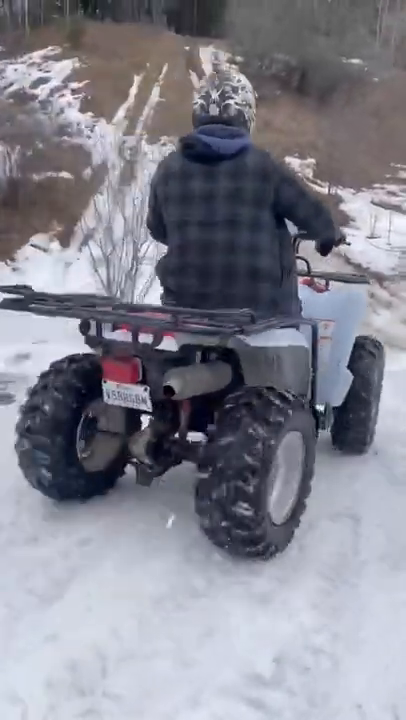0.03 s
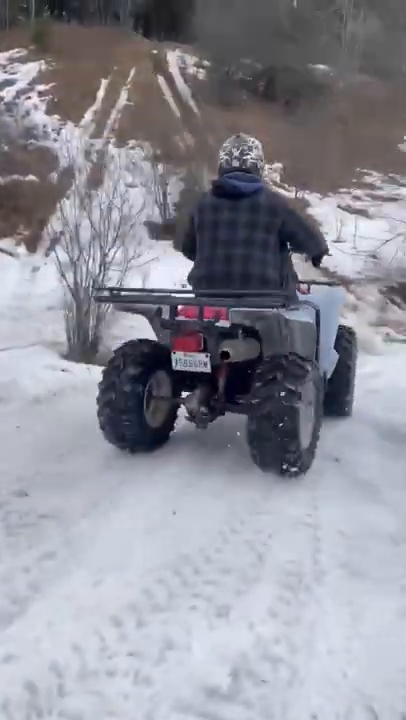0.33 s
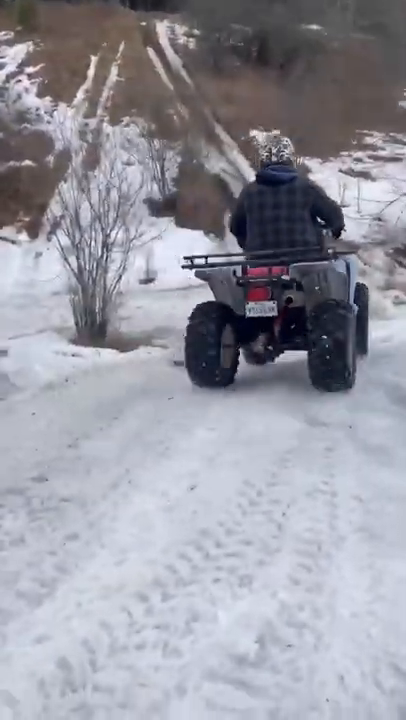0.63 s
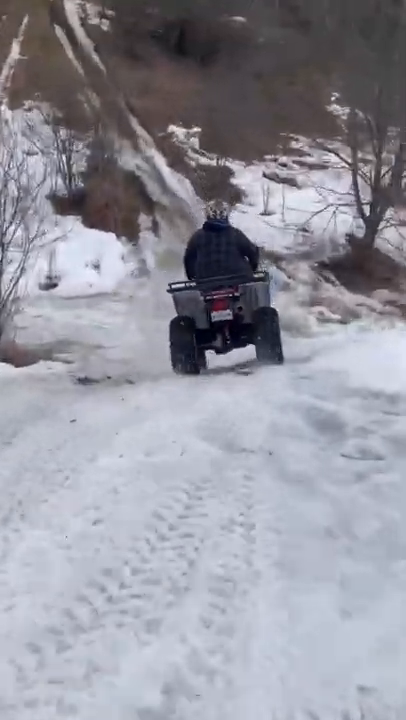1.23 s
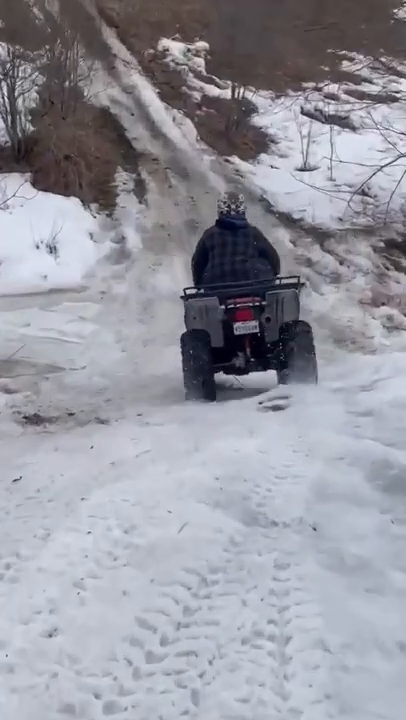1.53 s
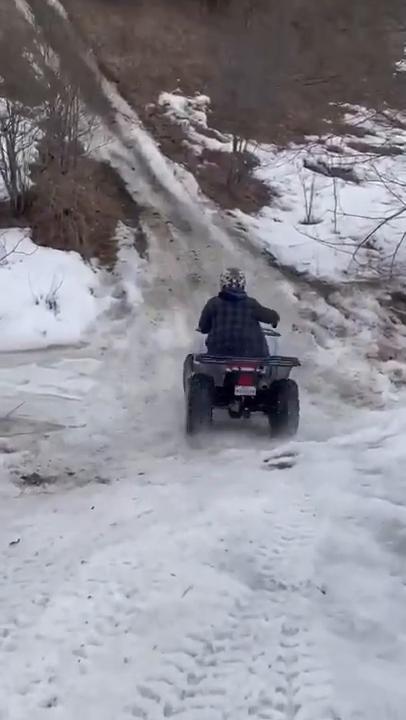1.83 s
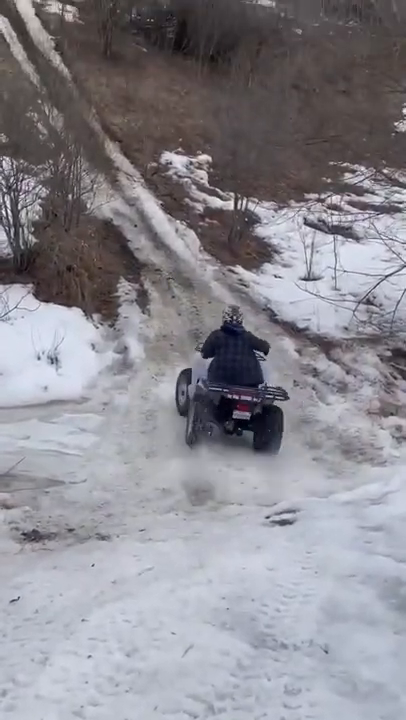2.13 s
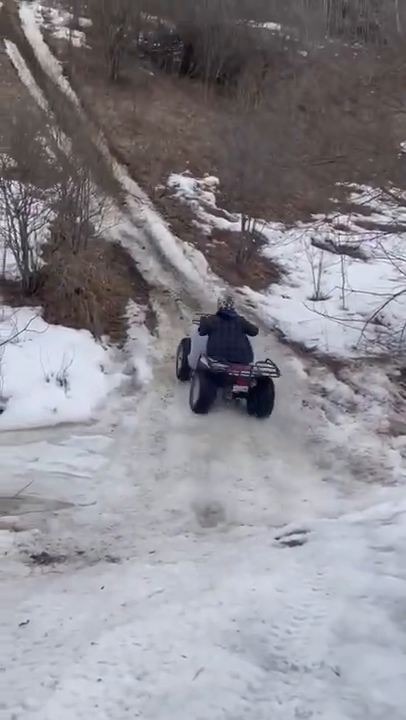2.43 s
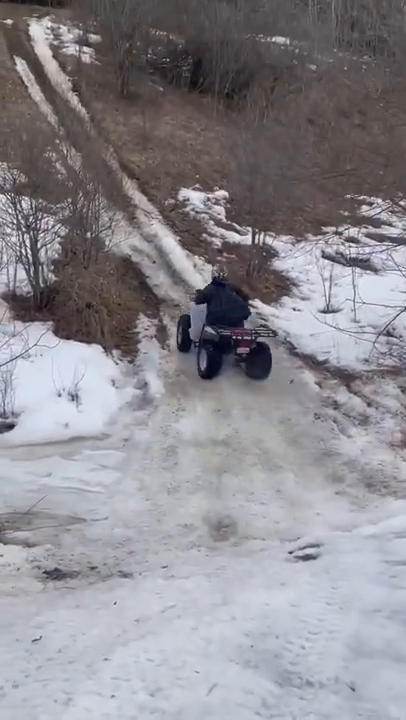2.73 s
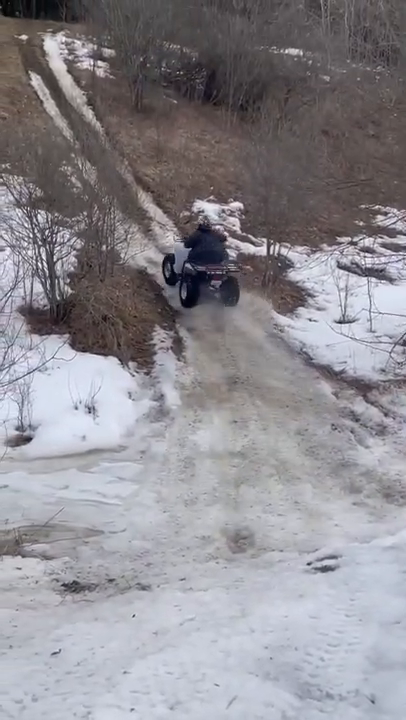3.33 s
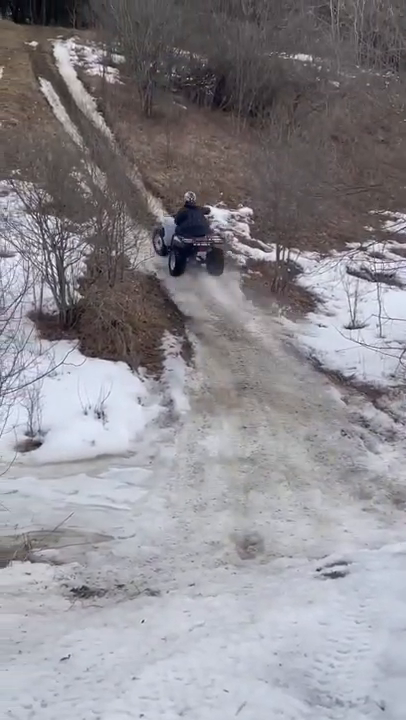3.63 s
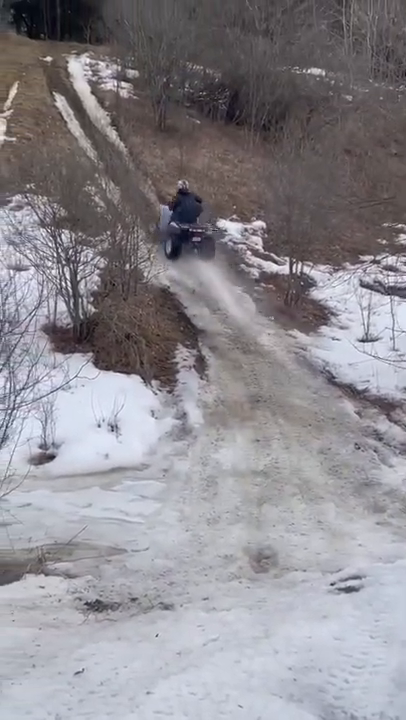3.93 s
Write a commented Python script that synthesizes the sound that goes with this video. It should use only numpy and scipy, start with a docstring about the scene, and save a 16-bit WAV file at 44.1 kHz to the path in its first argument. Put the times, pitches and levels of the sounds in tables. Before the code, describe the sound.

A single-cylinder quad bike pulls away close by over crunching snow, with a few metallic clacks. It coasts briefly with uneven pops, then accelerates uphill with a growing rasp, while light wind rumbles on the microphone.

```python
"""A single-cylinder quad bike pulls away over crunching snow, with a metallic ring and a few clacks,
while a light wind rumbles on the microphone. Each firing booms in the silencer and cracks out of the pipe.
Just before one second the quad coasts for a moment and the engine pops unevenly.
Then it speeds up and climbs a hill: the rasp grows under load, the hillside throws back an echo,
and the pulsing hiss smears out with distance."""
import sys
import numpy as np
from scipy import signal
from scipy.io import wavfile
from scipy.ndimage import uniform_filter1d

SR = 44100
rng = np.random.default_rng(int(sys.argv[2]) if len(sys.argv) > 2 else 0)


def store_pcm(level_fs):
    """Save levels as 16-bit WAV."""
    pcm = np.round(np.clip(level_fs, -1, 1) * 32767).astype(np.int16)
    wavfile.write(sys.argv[1], SR, np.atleast_2d(pcm).T)


N = 176400
T = np.arange(N) / SR


def amp(db):
    """Turns decibels into a number to multiply by."""
    return 10 ** (np.asarray(db) / 20)


def curve(table, column=1):
    """Joins one column of a time table by straight lines."""
    table = np.array(table)
    return np.interp(T, table[:, 0], table[:, column])


def swell(middle_s, half_length_s):
    """A bell-shaped gain that rises to 1 and falls again."""
    return np.exp(-np.square((T - middle_s) / half_length_s))


def unit(x):
    """Scales a signal to an average level of 1."""
    return x / np.sqrt(np.mean(x ** 2) + 1e-20)


def smooth(x, size):
    """Averages twice over `size` neighbouring values."""
    return uniform_filter1d(uniform_filter1d(x, size), size)


def steady(x):
    """Holds the slow level at 1 and leaves the single beats alone."""
    return x / np.sqrt(abs(smooth(x ** 2, size=4400)) + 1e-14)


def add(mix, start_s, sound):
    """Mixes a short sound in at the given time."""
    part = mix[max(round(start_s * SR), 0):][:len(sound)]
    part += sound[:len(part)]


def colour(x, tone):
    """Filters by a table of pitch_hz, gain_db; the filter rings after a click, never before it."""
    pitch_hz, gain_db = np.transpose(tone)
    bin_hz = abs(np.fft.fftfreq(16384, 1 / SR))
    log_gain = np.log(amp(np.interp(np.log(bin_hz + 1), np.log(pitch_hz), gain_db)))
    spectrum = np.exp(np.conj(signal.hilbert(log_gain)))
    click_response = np.fft.ifft(spectrum).real[:4096]
    return signal.oaconvolve(x, click_response)[:len(x)]


def resonate(x, pitch_hz, width_hz, widen=2):
    """Rings at one pitch through two resonances in a row, the second `widen` times as wide."""
    for band_hz in (width_hz, widen * width_hz):
        r = np.exp(-np.pi * band_hz / SR)
        x = signal.lfilter([1 - r, 0, r - 1], [1, -2 * r * np.cos(2 * np.pi * pitch_hz / SR), r * r], x)
    return x


def flicker(depth_db=1.3):
    """A gain that wavers by chance a few times a second."""
    return amp(depth_db * unit(smooth(rng.standard_normal(N), size=3500)))


def grains(ticks_per_s=2500, spread_db=3):
    """Dense little ticks of uneven size."""
    sizes = amp(spread_db * np.minimum(rng.exponential(1, N), 6)) * rng.standard_normal(N)
    return unit(sizes * (rng.random(N) < ticks_per_s / SR))


def wind(level_db=-27, gust_db=1.5):
    """Light gusts make a low, lumpy rumble."""
    # tone of the wind: pitch_hz, gain_db
    wind_tone = [(15, -23), (32, -16), (55, 2.5), (100, 4), (160, -11), (250, -8), (500, -15.5),
                 (1500, -21), (6000, -58)]
    gusts = unit(smooth(rng.standard_normal(N), size=5000))
    return unit(colour(rng.standard_normal(N), wind_tone)) * amp(level_db + gust_db * gusts)


def tyres():
    """Snow and slush crunch under the treads and fly off as a fine spray."""
    # tones of the crunch and the spray: pitch_hz, gain_db
    crunch_tone = [(200, -16), (600, 7.5), (1800, 11.5), (3500, 4), (6000, -6.5), (7800, -37),
                   (12000, -7.5)]
    spray_tone = [(5000, -17), (8000, -20), (9500, 7.5), (11000, 6.5), (12000, -16)]
    # how loud each is: time_s, level_db
    crunch_levels = [(0, -38.5), (.48, -39.5), (.62, -40.5), (1, -46), (1.7, -37.5), (2, -35), (3, -32),
                     (4, -39)]
    spray_levels = [(0, -49), (.45, -50), (.7, -61), (1, -61.5), (1.15, -55.5), (1.6, -60.5), (1.95, -48),
                    (2.4, -47), (2.9, -52), (3.2, -52.5), (4, -55.5)]
    crunch = unit(colour(grains(), crunch_tone)) * amp(curve(crunch_levels))
    spray = unit(colour(grains(), spray_tone)) * amp(curve(spray_levels)) * flicker()
    return crunch + spray


def chassis(decay_s=.012):
    """The rack and drive clack over bumps."""
    # one clack a row: start_s, level_db
    clacks = [(.004, -35), (0.146, -39), (0.409, -38), (2.449, -35), (2.74, -42), (2.853, -40),
              (3.367, -38)]
    # tone of a clack: pitch_hz, gain_db
    clack_tone = [(600, -21), (1500, -41), (2800, 2), (4000, -1), (5200, 18), (7500, 16.5), (12000, -23)]
    out, t = np.zeros(N), T[:2000]
    for start_s, level_db in clacks:
        noise = unit(colour(rng.standard_normal(len(t)), clack_tone))
        add(out, start_s, amp(level_db) * noise * np.exp(-t / decay_s))
    return out


def metallic_ring(level_db=-37.5):
    """A ring at one pitch, probably from the drive, heard while the quad is close."""
    ring = resonate(rng.standard_normal(N), pitch_hz=1710, width_hz=45)
    return steady(ring) * amp(level_db) * swell(middle_s=.34, half_length_s=.51)


def hillside_echo(x, strength=.45, arrive_s=2.4, fade_s=.4):
    """The hill throws the sound back ever later as the quad climbs, sweeping the tone downwards."""
    # how late the echo is: time_s, delay_s
    delays = [(2.1, .0006), (2.6, .00127), (3.05, .00163), (3.3, .00196), (4, .0026)]
    gain = strength * np.clip((T - arrive_s) / fade_s + .5, 0, 1)
    echo = np.interp(T - curve(delays), T, x)
    return (x + gain * echo) / np.sqrt(1 + gain ** 2)


def coasting_pops(boom_hz=106.8, rise_s=.0048, decay_s=.01872, puff_s=.0024):
    """With the throttle shut, uneven firings give a deeper boom and a short hollow bark."""
    # one pop a row: start_s, boom_db, bark_db
    pops = [(.753, -10, -46), (0.782, -25, -23.5), (0.811, -18, -28), (0.841, -13, -32), (0.896, -8, -23),
            (0.958, -12, -23.5), (1.059, -35, -22.5)]
    out, t = np.zeros(N), T[:6000]
    boom = (1 - np.exp(-t / rise_s)) * np.exp(-t / decay_s) * np.sin(2 * np.pi * boom_hz * t)
    for start_s, boom_db, bark_db in pops:
        puff = rng.standard_normal(len(t)) * t * np.exp(-t / puff_s)
        bark = resonate(puff, pitch_hz=1004, width_hz=160)
        add(out, start_s, amp(bark_db) * bark / abs(bark).max() - amp(boom_db) * boom / abs(boom).max())
    return out


def firing_times(wobble_s=.00016, jitter_s=.00004):
    """The engine fires in step with its speed, wobbling a little over a few turns."""
    # engine speed: time_s, firings_per_s
    speed = [(0.0, 25.71), (0.335, 32.56), (0.503, 33.8), (0.73, 35.9), (0.93, 33.1), (1.006, 28.66),
             (1.239, 33.8), (1.57, 40.16), (1.803, 48.27), (2.044, 49.36), (2.122, 52.95), (2.374, 55.73),
             (2.578, 57.82), (2.631, 59.88), (2.915, 61.68), (3.219, 62.7), (3.463, 62.76), (3.611, 63.89),
             (3.794, 61.71), (3.895, 64.44), (4.0, 63.38)]
    fired_so_far = np.cumsum(curve(speed)) / SR
    times = np.interp(np.arange(int(fired_so_far[-1]) + 1), fired_so_far, T)
    slow, fast = rng.standard_normal((2, 400))
    return times + (wobble_s * unit(smooth(slow, size=4)) + jitter_s * fast)[:len(times)]


def firing_clicks(times, delay_s, scatter_db=.8):
    """One click for each firing, a little uneven in strength."""
    at = np.clip(np.round((times + delay_s) * SR).astype(int), 0, N - 1)
    clicks = np.zeros(N)
    clicks[at] = amp(scatter_db * rng.standard_normal(size=400)[:len(at)])
    return clicks


def gas_bursts(clicks, fresh_share, tail_db, smear_db=0, stages=15):
    """Each firing lets out a burst of gas; its shape repeats, slowly smearing as the quad moves off."""
    rise_s, near_decay_s, far_decay_s, tail_s = .0012, .0016, .0018, .032
    t, repeated, power = T[:2600], np.zeros(N), np.zeros(N)
    for distance in np.linspace(0, 1, stages):  # each stage fades into the next
        decay_s = near_decay_s + (far_decay_s - near_decay_s) * distance
        echo_tail = amp(tail_db + smear_db * distance) * np.exp(-t / tail_s)
        burst = (1 - np.exp(-t / rise_s)) * (np.exp(-t / decay_s) + echo_tail)
        stage_clicks = clicks * np.cos(np.pi / 2 * np.clip((T / T[-1] - distance) * (stages - 1), -1, 1))
        repeated += signal.oaconvolve(stage_clicks, burst * rng.standard_normal(len(t)))[:N]
        power += signal.oaconvolve(stage_clicks ** 2, burst ** 2)[:N]
    fresh = np.sqrt(fresh_share * abs(power)) * rng.standard_normal(N)  # new noise in every burst
    return np.sqrt(1 - fresh_share) * repeated + fresh


def pipe_rings(clicks, gas, stirred_hz=980):
    """The pipe's low resonances ring cleanly; its high ones are stirred by the gas."""
    # notes that stand out for a while: middle_s, half_length_s, pitch_hz, width_hz, level_db
    rings = [(0.044, 0.15, 429, 41, -28), (0.253, 0.26, 460, 110, -34.5), (0.6, 0.068, 970, 79, -32.5),
             (1.204, 0.092, 1600, 110, -35.5), (1.22, 0.14, 1050, 110, -44), (1.513, .2, 640, 24, -35.5),
             (1.644, 0.13, 832, 130, -33), (1.953, 0.32, 277, 52, -31.5), (2.38, 0.32, 1434, 170, -32.5),
             (2.644, 0.11, 1720, 430, -24.5), (2.02, 0.05, 1610, 490, -27), (3.064, 0.16, 2344, 260, -31),
             (3.114, 0.27, 1023, 45, -30), (3.42, 1, 870, 10.4, -37), (3.67, 0.45, 1005, 53, -36),
             (0.64, 0.25, 184, 23, -26)]
    out = np.zeros(N)
    for middle_s, half_length_s, pitch_hz, width_hz, level_db in rings:
        stir = .77 * min(pitch_hz / stirred_hz, 1) ** 2
        ring = resonate(unit(clicks) + stir * unit(gas), pitch_hz, width_hz, widen=3)
        out += steady(ring) * amp(level_db) * swell(middle_s, half_length_s)
    return out


def tailpipe(times, scatter_db=1.67, bark_trim_db=-3):
    """Gas cracks out of the pipe as a middle bark, a higher rasp and a hiss on top."""
    # the crack comes earlier once the throttle opens: time_s, delay_s
    crack_delays = [(.6, .0015), (1.1, -.0006)]
    # how loud each part is, before the bark's trim: time_s, bark_db, rasp_db, hiss_db
    levels = [(0.0, -25.5, -50, -32), (0.03, -30.5, -42, -40.5), (0.4, -26.5, -39, -38),
              (0.58, -29, -54, -45), (0.85, -37.5, -47, -50.5), (1.0, -44, -56, -54), (1.1, -29, -42, -44),
              (1.5, -32.5, -44, -45.5), (1.83, -31.5, -33.5, -42), (1.93, -30.5, -27, -32.5),
              (2.38, -29.5, -31.5, -37), (2.57, -26.5, -28, -34), (2.81, -25.5, -31, -40),
              (2.88, -28, -27.5, -31.5), (3.04, -28, -30, -37), (3.69, -29, -30, -36.5),
              (4.0, -27.5, -34.5, -39.5)]
    # tone of each part: pitch_hz, gain_db
    bark_tone = [(200, -48.5), (450, -7), (750, -2), (1000, 3.5), (1400, 3.5), (1900, -3.5), (2400, -12.5),
                 (4000, -33.5)]
    rasp_tone = [(1000, -37.5), (1800, 2), (2200, 0.5), (2600, 1), (3050, 2), (3600, -6), (4500, -15),
                 (8000, -60)]
    hiss_tone = [(2000, -17), (3800, 0), (5000, 4.5), (6200, 3), (7600, -19.5), (8600, -27), (12000, -17)]
    times = times + np.interp(times, *np.transpose(crack_delays))
    direct = firing_clicks(times, delay_s=0, scatter_db=scatter_db)
    # each crack returns once down the pipe, strongest while the quad is close
    returned = firing_clicks(times, delay_s=.0058, scatter_db=scatter_db)
    return_db = -15 + 6.5 * swell(middle_s=0, half_length_s=1.7)
    clicks = direct + amp(return_db) * returned
    gas = gas_bursts(clicks, fresh_share=.15, tail_db=-19.5)
    bark = steady(colour(hillside_echo(gas), bark_tone)) * amp(curve(levels, column=1) + bark_trim_db)
    rasp = hillside_echo(gas_bursts(clicks, fresh_share=.25, tail_db=-17.5))
    rasp = steady(colour(rasp, rasp_tone)) * amp(curve(levels, column=2)) * flicker()
    hiss = steady(hillside_echo(gas_bursts(clicks, fresh_share=.7, tail_db=-11, smear_db=30)))
    chain_whirr = .67 * grains()  # chain and gears run evenly against the pulsing hiss
    hiss = steady(colour(hiss + chain_whirr, hiss_tone)) * amp(curve(levels, column=3)) * flicker()
    return bark + rasp + hiss + pipe_rings(direct, gas)


def silencer(times, coast_db=-4.5, drone_trim_db=-2):
    """Firings ring the silencer: a deep thud, a boom that weakens while coasting, and a drone."""
    # tone of each part, with the drone close by and up the hill: pitch_hz, gain_db
    thud_tone = [(20, -52), (45, -11), (60, -1), (75, 11), (110, -15), (300, -102)]
    boom_tone = [(40, -31.5), (80, -37), (110, -5), (132, 2), (160, -6), (195, -12.5), (260, -49),
                 (600, -80)]
    near_tone = [(110, -56), (165, -3), (210, -4), (275, 3), (330, -8.5), (400, -13), (520, -17.5),
                 (1200, -59.5)]
    far_tone = [(120, -57.5), (200, -11.5), (252, 5), (310, -8), (374, 1), (440, -18), (600, -20),
                (1200, -72)]
    # how loud the thud is: time_s, level_db
    thud_levels = [(0, -28), (.45, -23.5), (.75, -29), (1.05, -31), (1.5, -30), (2, -23), (2.4, -31.5),
                   (3.2, -36), (4, -30)]
    # how loud the others are, before the coasting dip and the trim: time_s, boom_db, drone_db
    levels = [(0.0, -18, -24), (0.03, -15.5, -26), (0.31, -15, -31.5), (0.72, -21.5, -29.5),
              (0.77, -12.5, -39), (0.83, -16.5, -25), (0.88, -17, -49), (0.9, -15, -24.5),
              (0.93, -18.5, -54), (1.06, -16.5, -27.5), (1.17, -19.5, -25), (1.57, -23.5, -21.5),
              (1.68, -22, -23.5), (2.75, -18, -22), (3.05, -16.5, -21), (3.75, -18.5, -25),
              (4.0, -18.5, -29.5)]
    coast_s, coast_half_s, far_s, far_fade_s = .874, .19, 2.35, .75
    coasting = np.exp(-((T - coast_s) / coast_half_s) ** 4)
    far = np.clip((T - far_s) / far_fade_s + .5, 0, 1)
    thud = steady(colour(firing_clicks(times, delay_s=.0037), thud_tone))
    boom = steady(colour(firing_clicks(times, delay_s=.0026), boom_tone))
    clicks = firing_clicks(times, delay_s=.002)
    drone = steady((1 - far) * colour(clicks, near_tone) + far * colour(clicks, far_tone))
    return (thud * amp(curve(thud_levels))
            + boom * amp(curve(levels, column=1) + coast_db * coasting)
            + drone * amp(curve(levels, column=2) + drone_trim_db))


def scene():
    """Adds the quad and the wind together in one channel."""
    times = firing_times()
    exhaust = silencer(times) + coasting_pops() + tailpipe(times)
    return (exhaust + metallic_ring() + chassis() + tyres() + wind())[None]


def record(dry):
    """Cuts off the very highest treble."""
    cutoff_hz = 11900
    low_pass = signal.firwin(511, cutoff_hz, window=("kaiser", 9), fs=SR)
    return signal.oaconvolve(dry, low_pass[None], "same")


dry = scene()
out = record(dry)
store_pcm(out)
```